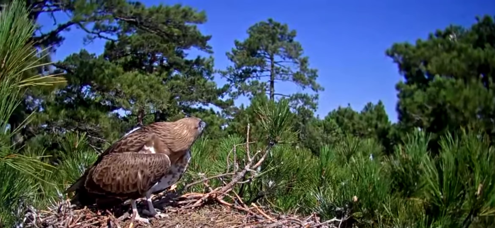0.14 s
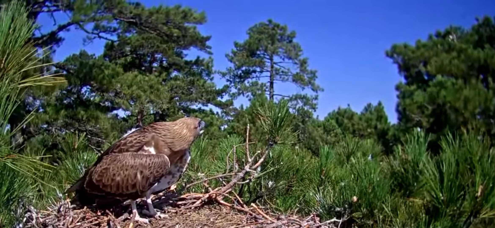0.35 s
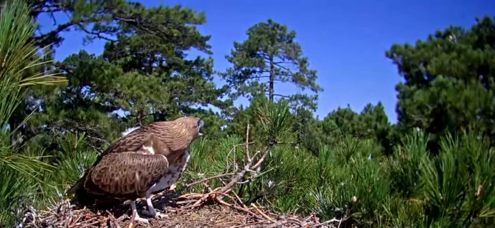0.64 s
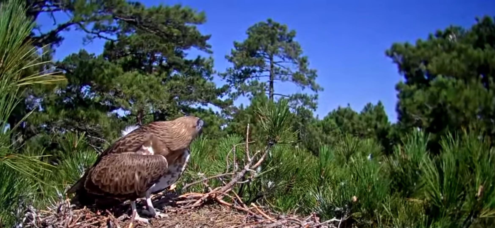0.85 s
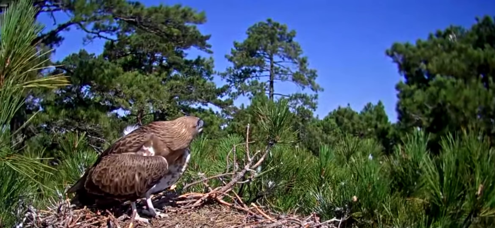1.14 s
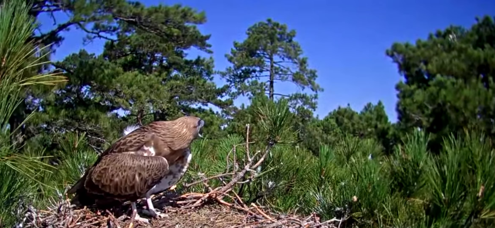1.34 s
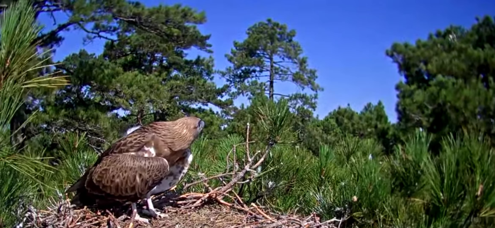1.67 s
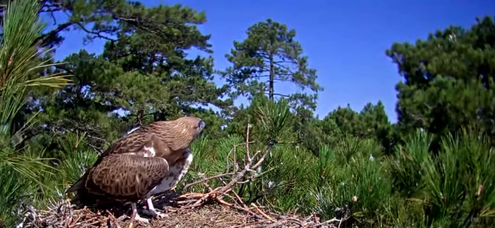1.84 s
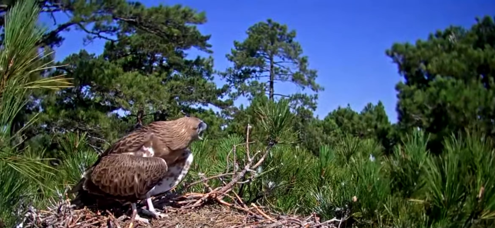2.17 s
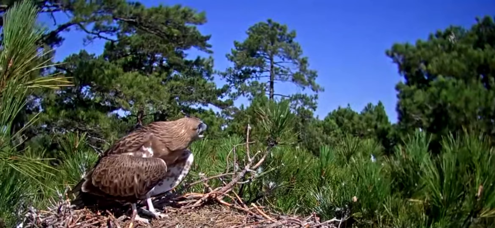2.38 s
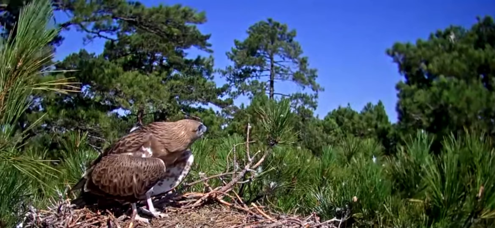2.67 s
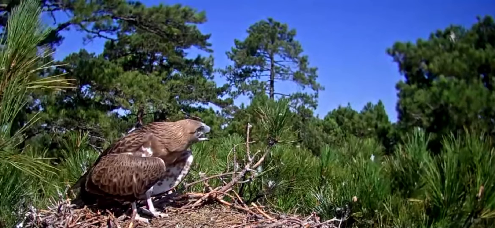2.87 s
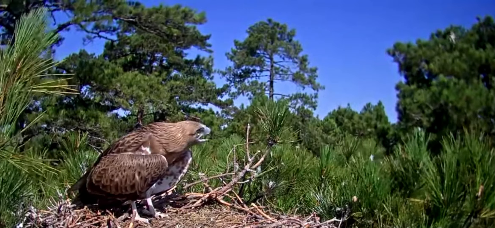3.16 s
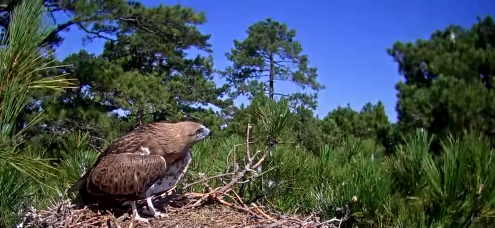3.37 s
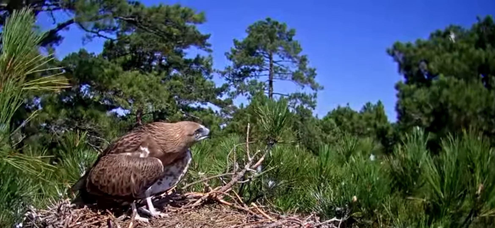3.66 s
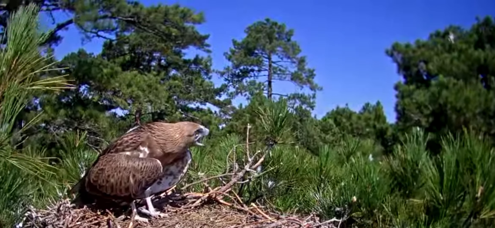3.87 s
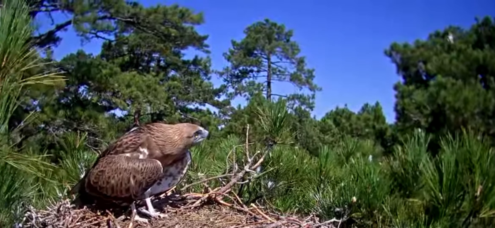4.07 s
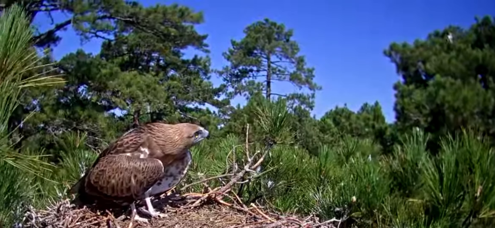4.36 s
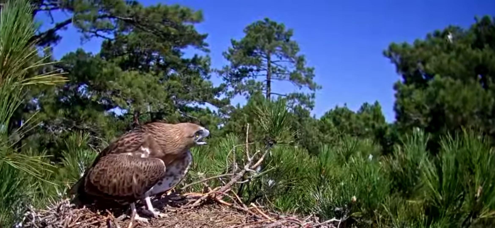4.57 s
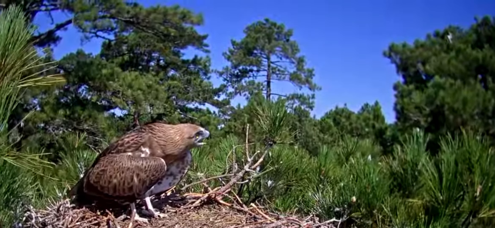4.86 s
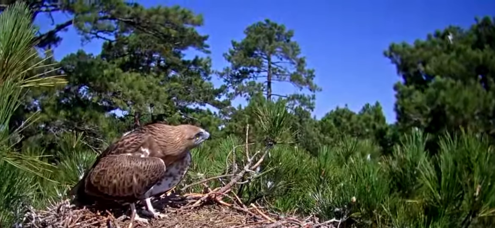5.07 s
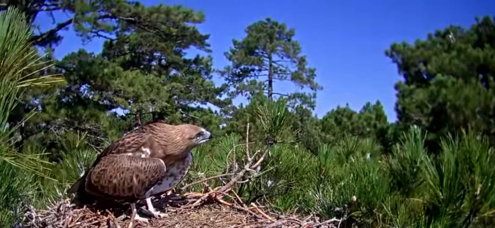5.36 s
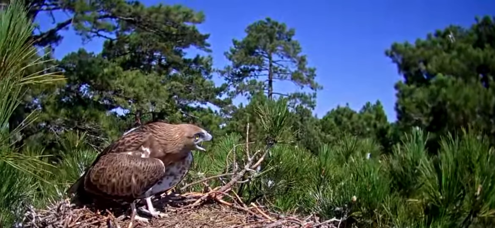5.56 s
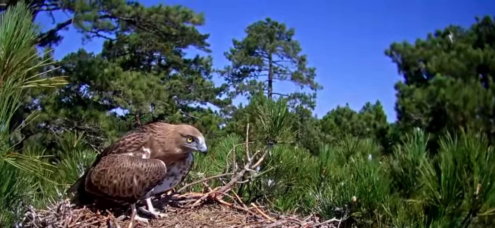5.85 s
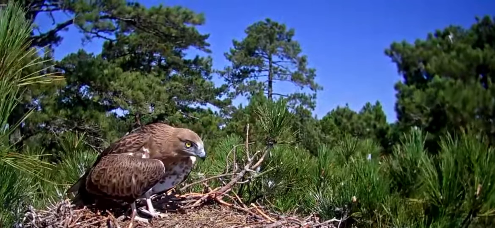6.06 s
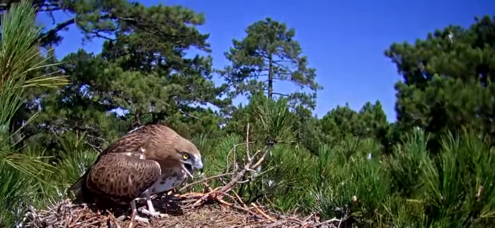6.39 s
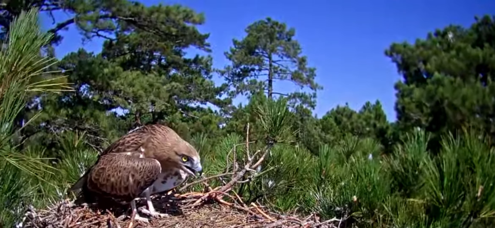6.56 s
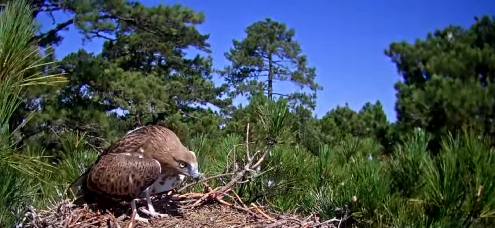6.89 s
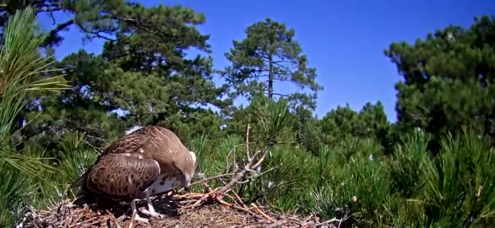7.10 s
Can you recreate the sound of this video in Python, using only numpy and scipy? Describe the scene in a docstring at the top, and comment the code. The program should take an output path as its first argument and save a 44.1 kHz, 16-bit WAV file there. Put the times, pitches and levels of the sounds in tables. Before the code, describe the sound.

Shrill, nearly evenly spaced whistling cries of a young bird of prey, each cracking downward at the end, over low wind buffeting in open pine forest.

```python
"""Young eagle screaming in a pine top

A young eagle screams again and again, close to a small microphone. Each scream jumps through registers:
a chirp, a raspy high note, then a long whistle that breaks into a falling low note. The voice is stacked
overtones of moving pitch, roughened by a second side of the syrinx, flutter and noise ringing the throat.
Low noise rumbles as wind on the microphone, the forest hisses and returns a faint echo; loud peaks clip.
"""
import sys
import numpy as np
from scipy import signal
from scipy.fft import rfft, irfft
from scipy.io import wavfile
from scipy.ndimage import uniform_filter1d

SR = 44100
rng = np.random.default_rng(int(sys.argv[2]) if len(sys.argv) > 2 else 0)


def wav_record(signal):
    """Record a signal, one row per channel, as 16-bit PCM in the file named by sys.argv[1]."""
    frames = np.transpose(np.atleast_2d(signal))
    bounded = np.clip(frames, -1, 1)
    # unit amplitude maps onto the largest positive 16-bit level
    quanta = np.round(bounded * 32767).astype(np.int16)
    wavfile.write(sys.argv[1], SR, quanta)


N = 318843  # samples

# Whistles: t/s, end t/s, settled f/Hz, sharp start f/Hz, drift/(Hz per s), level/dB, fade/(dB per s),
# octave relative level/dB, held flutter level/dB, flutter level at the break/dB, flutter build-up/s
WHISTLES = [(-.03, 0.155, 2334, 340, 10, -33.5, 19.5, -17.5, -30, -6, 0.0093),
            (0.8, 1.037, 2315, 122, 117, -31, 32.5, -19, -38, -24, 0.046),
            (1.604, 1.732, 2350, 162, -46, -34.5, 4, -16, -27.5, -2.5, 0.014),
            (1.734, 1.757, 2365, 5.9, -12, -35.5, 21.5, -16.5, -20, -7.5, 0.03),
            (2.495, 2.708, 2410, 93, -47.5, -33.5, 25, -13.5, -43.5, -23, 0.027),
            (3.29, 3.5, 2386, 153, -9.5, -32, 26.5, -16, -48, -8.5, 0.04),
            (4.108, 4.349, 2395, 135, 47.5, -31, 26, -13.5, -45.5, -25, 0.033),
            (4.977, 5.223, 2398, 126, 0, -31, 26.5, -13.5, -41, -32, 0.035),
            (5.873, 5.96, 2451, 48.5, 8.5, -31, 24.5, -13.5, -40, -7, 0.013),
            (6.702, 6.844, 2579, 160, -400, -31, 18, -11, -46, -4.5, 0.024)]
IDLE_HZ, IDLE_DB = 3280, -51.5  # the high side of the syrinx idles under the whistle, relative level


def whistles():
    """A nearly pure note flutters ever deeper, slower and less evenly as it nears its break."""
    out = np.zeros(N)
    for *shape, octave_db, held_db, break_db, build_s in WHISTLES:
        i, fade, hz, db = note(whistle_contour(*shape), 0.0052)
        size = len(i)
        breaking = undb(break_db) * np.exp((i - i[-1]) / SR / build_s)
        # the depth itself varies less as the break nears
        depth = (undb(held_db) + breaking) * undb(6 * wander(28, size) / (1 + 10 * breaking))

        # a slow membrane at about a seventh of the pitch puts lines mostly below each partial
        unevenness = (.06 + .1 * breaking) * wander(80, size)
        slow = turn(.14 * hz * (1 - .2 * breaking + unevenness))
        flutter = depth * (slow.conj() + 0.065 * slow + .5 * depth * slow.conj() ** 2)

        clean, z = stack(hz, db, db + octave_db + 1.8 * wander(30, size))
        below_octave = undb(db + octave_db + 2.5) * depth * z ** 2 * slow.conj()
        tone = clean * (1 - 0.5 * breaking + flutter) + below_octave
        airflow = undb(db - 24) * (depth + .028) * rasp(size)

        idle_level = undb(db + IDLE_DB + 7 * wander(40, size))
        idle = turn(IDLE_HZ * (1 + .01 * wander(90, size))) * idle_level
        idle = idle * (1 + undb(-12) * z)  # adds the sum tone with the whistle
        out[i] += fade * (tone.imag + airflow + idle.imag)
    return out


WHISTLE_SWELL_S, WHISTLE_ATTACK_S, SETTLE_S = 0.038, .005, .018
SAG_HZ, SAG_DB, SAG_S = 1020, 33, .027  # as the breath runs out
DIVE_HZ, DIVE_S = 29, 0.03  # just before the break


def whistle_contour(s, end, hz, sharp_hz, drift, db, fade_db):
    """Starts sharp, settles and swells; pitch and level sag as the end of the breath nears."""
    now = ticks(max(s, 0), end)
    t = now - s
    breath_end = min(row[1] for row in LOW_NOTES if row[1] > end)  # where the next low note dies
    spent = np.exp((now - breath_end) / SAG_S)
    settling = sharp_hz * np.exp(-t / SETTLE_S)
    dive = DIVE_HZ * np.exp((now - end) / DIVE_S)
    pitch = hz + drift * t + settling - SAG_HZ * spent - dive
    swell = (1 - 0.25 * np.exp(-t / WHISTLE_SWELL_S)) * (1 - 0.88 * np.exp(-t / WHISTLE_ATTACK_S))
    return np.transpose([now, pitch, db - fade_db * t - SAG_DB * spent + 20 * np.log10(swell)])


# The odd lines between the partials: multiple of half the pitch
HALF_LINES = (1, 3, 5, 7)
HOARSE_SHARE = 1.38  # pitch of the other side of the syrinx over the low note
# Low notes that the whistles break into: t/s, breath gone t/s, f/Hz before the droop, droop/s,
# suddenness of the droop (exponent), starting level/dB, hoarseness relative level/dB
LOW_NOTES = [(0.162, 0.259, 1833, 0.041, 1.23, -46.5, -16), (1.044, 1.09, 1863, 0.042, 0.82, -45, -14),
             (1.767, 1.887, 1896, 0.056, 1.12, -43.5, -21.5), (2.715, 2.772, 1858, 0.037, 1.12, -48, -11.5),
             (3.507, 3.591, 1878, 0.044, 1.16, -44.5, -12.5), (4.357, 4.401, 1892, 0.041, 1.06, -43, -10.5),
             (5.232, 5.274, 1875, 0.04, 0.82, -43, -28), (5.971, 6.162, 1958, 0.045, 1.34, -37, -27.5),
             (6.857, 6.977, 2000, 0.042, 0.94, -34.5, -25.5)]


def low_notes():
    """The voice drops in from above and droops; the other side rasps, half lines come when forced."""
    out = np.zeros(N)
    for *shape, hoarse_db in LOW_NOTES:
        rows = low_contour(*shape)
        s, hz, db = rows[0]
        # the louder the break, the longer and deeper the slide into the low register
        force = np.clip((db + 56) / 19, 0, 1)
        start = (s - .005 * force - .002, hz * (1 + .15 * force), db - 1)
        i, fade, hz, db = note([start] + list(rows), 0.0027)
        size = len(i)
        t = (i - i[0]) / SR

        # the overtones die before the fundamental
        octave_db = db + colour(THROAT, 2 * hz) - ((db.max() - db) / 7) ** 2
        clean, z = stack(hz, db, octave_db, lead=np.pi / 4)

        # high-pitched low notes are the forced ones
        forced = np.clip((hz - 1885) / 45, 0, 1) * np.clip(t / 0.018, 0, 1)
        half = np.exp(.5j * np.unwrap(np.angle(z)))
        halves = 0
        for k in HALF_LINES:
            line_db = colour(THROAT, k * hz / 2) - 3.4 * (k > 5)
            halves = halves + undb(line_db) * grain(size) * half ** k

        other = grain(size) * turn(HOARSE_SHARE * hz * (1 + .025 * wander(90, size)))
        # the other side also mixes with the note and its octave
        hoarse = other * (1 + undb(-4.5) * z + undb(-13.5) * z ** 2) * np.clip(t / 0.011, 0, 1)

        # fast unevenness spreads a skirt round the partials
        grit = 1 + undb(-31 + 5 * forced) * wander(520, size)
        tone = clean * grit + undb(db - 15.5) * forced * halves + undb(db + hoarse_db) * hoarse
        airflow = undb(db - 23 + 2.6 * forced) * np.clip(t / .04, 0, 1) * rasp(size)
        out[i] += fade * (tone.imag + airflow)
    return out


def grain(size):
    """Fast random roughness of loudness around 1."""
    return 1 + .38 * wander(180, size)


DROOP_SHARE, DROOP_DB, LOW_FADE_DB_PER_S = 0.31, 48, 15  # share of the pitch; level lost


def low_contour(s, end, hz, droop_s, sudden, db):
    """Pitch and level droop as the last breath goes."""
    t = ticks(s, end)
    spent = np.exp(-(np.abs(end - t) / droop_s) ** sudden)
    level_db = db - LOW_FADE_DB_PER_S * (t - s) - DROOP_DB * spent ** 1.75
    return np.transpose([t, hz * (1 - DROOP_SHARE * spent), level_db])


# The rattling side of the syrinx: f/Hz, relative level/dB (per Hz)
RATTLE = [(1400, -54), (1850, -23), (2070, 7.5), (2230, -12.5), (2480, -2), (2750, -27), (3400, -52)]
# High notes: t/s, length/s, swell/s, starting f/Hz, glide/(Hz per s), level/dB, rasp relative level/dB
HIGH_NOTES = [(0.731, 0.063, 0.031, 3280, -1200, -44.5, -9.5),
              (1.542, 0.058, 0.039, 3280, -1400, -46, -11.5),
              (2.408, 0.079, 0.049, 3325, -1250, -43.5, -11),
              (3.248, 0.035, 0.0032, 3334, -2400, -43, -12.5),
              (4.038, 0.064, 0.024, 3342, -700, -43.5, -10.5),
              (4.903, 0.065, 0.039, 3343, -200, -41.5, -15), (5.784, 0.082, 0.048, 3350, -800, -43, -15),
              (6.657, 0.042, 0.018, 3450, 281.5, -39, -34)]


def high_notes():
    """One side of the syrinx holds a clean tone; the other rattles below, mixes with it and dies away."""
    out = np.zeros(N)
    for *shape, rasp_db in HIGH_NOTES:
        i, fade, hz, db = note(high_contour(*shape), 0.012)
        size = len(i)
        unsteady_hz = hz * (1 + 0.0058 * wander(82, size))
        # the octave swells twice as steeply in dB as the fundamental
        clean, z = stack(unsteady_hz, db, 2 * db - db.max() - 27.5)

        swell = np.sin(np.pi * np.linspace(0, 1, size) ** 1.2) ** 0.8
        rattle = signal.hilbert(noise(RATTLE, size)) * undb(2.5 * wander(60, size))
        # the rattle's octave, and sum and difference tones of the two sides
        mixed = rattle + undb(-22) * rattle ** 2
        mixed = mixed + undb(-19) * z * rattle + undb(-17.5) * z ** 2 * rattle.conj()
        airflow = undb(-14) * rasp(size)
        out[i] += fade * (clean.imag + undb(db + rasp_db) * swell * (mixed.imag + airflow))
    return out


HIGH_START_DB = -31  # relative to the held note


def high_contour(s, length, swell_s, hz, glide, db):
    """The note swells in evenly, holds, and glides a little."""
    t = ticks(0, length)
    gain = np.interp(t, [0, swell_s], [undb(HIGH_START_DB), 1])
    return np.transpose([s + t, hz + glide * t, db + 20 * np.log10(gain)])


# Short rising chirps before a scream: nominal t/s, nominal length/s, start f/Hz, end f/Hz, level/dB
CHIRPS = [(0.697, 0.012, 1665, 1860, -61), (1.515, 0.012, 1730, 1894, -59.5),
          (2.381, 0.016, 2610, 2790, -72), (3.229, 0.0084, 3300, 3420, -59),
          (4.011, 0.013, 1800, 1930, -54.5), (4.874, 0.014, 1760, 1937, -56),
          (5.774, 0.0074, 2570, 2865, -67), (6.622, 0.015, 1910, 2075, -49.5)]


def chirps():
    """Brief upward flicks, rich in overtones."""
    out = np.zeros(N)
    for s, length, start_hz, end_hz, level_db in CHIRPS:
        # the glide starts 7.7 ms after the cue and ends 3 ms before the nominal end (in the shortest chirps
        # that end comes first); 10 ms fades surround it
        rows = [(s + 0.0077, start_hz, level_db), (s + length - .003, end_hz, level_db)]
        i, fade, hz, db = note(rows, 0.01)
        tone, _ = stack(hz, db, db + colour(THROAT, 2 * hz) - 2.0)
        out[i] += fade * tone.imag
    return out


# Colour of throat and beak on the overtones: f/Hz, relative level/dB
THROAT = [(900, -12), (2900, -4.5), (3700, 2), (4700, 2.5), (5050, 2.5), (5450, -17), (6500, -9),
          (7400, -22), (9000, -38.5)]
JITTER = .0018  # spread, share of the pitch
OVERTONE_STEP_DB, OVERTONE_FLICKER_DB = -5.5, 3.5


def stack(hz, db, octave_db, lead=np.pi / 2):
    """Fundamental and octave; higher overtones step down, flicker and take the throat's colour."""
    size = len(hz)
    z = turn(hz * (1 + JITTER * wander(130, size)))
    shimmer = undb(0.088 * wander(150, size))
    upper, step_db = 0, 0
    for k in (2, 3, 4):
        flicker_db = (k > 2) * OVERTONE_FLICKER_DB * wander(60, size)
        tint_db = colour(THROAT, k * hz) - colour(THROAT, 2 * hz)
        upper = upper + undb(octave_db + tint_db + step_db + flicker_db) * z ** k
        step_db += OVERTONE_STEP_DB
    # overtones that lead by up to a quarter turn make the pressure troughs deeper than the crests
    return shimmer * (undb(db) * z + np.exp(1j * lead) * upper), z


# Resonances that unsteady airflow rings in the throat: f/Hz, relative level/dB (per Hz)
RASP = [(1700, -28.5), (2100, -12.5), (2750, -17.5), (3900, -11), (4450, -7), (4750, -16.5), (5080, -4),
        (5550, -26.5), (7500, -43.5)]


def rasp(size):
    """Unsteady airflow in bursts, ringing the throat."""
    return level(noise(RASP, size) * undb(2 * wander(71, size)), 0)


def note(rows, fade_s):
    """Sample range, edge fade, pitch and level of one note; loudness moves evenly in amplitude."""
    s, hz, db = np.transpose(rows)
    i = np.arange(max(int((s[0] - fade_s) * SR), 0), int((s[-1] + fade_s) * SR))
    t = i / SR
    fade = np.clip(np.minimum(t - s[0], s[-1] - t) / fade_s + 1, 0, 1)
    pitch = uniform_filter1d(np.interp(t, s, hz), int(.003 * SR))  # smoothed over 3 ms
    # the root of 2 makes a sine's level an rms level
    return i, np.sqrt(2) * fade, pitch, 20 * np.log10(np.interp(t, s, undb(db)))


def ticks(start, end):
    """Times a millisecond apart, closed by the end itself."""
    return np.append(np.arange(start, end, .001), end)


ECHO_DB, ECHO_T60_S, ECHO_BUILD_S = -47, 1.8, .13  # from the trees
NEAR_ECHO_DB, NEAR_ECHO_T60_S = -26, 0.28  # from near branches


def echo(x):
    """Scattered returns from near branches, and late, dull ones from the trees, as decaying noise."""
    t = np.arange(SR) / SR
    tail = noise([(3000, 0.5), (7000, -6.5)], SR) * undb(-60 * t / ECHO_T60_S)
    tail = tail * np.clip(t / ECHO_BUILD_S, 0, 1)
    near = noise([(3000, 0.0), (7000, -2.5)], SR) * undb(-60 * t / NEAR_ECHO_T60_S)
    both = 0
    for response, db in ((tail, ECHO_DB), (near, NEAR_ECHO_DB)):
        both = both + undb(db) * response / np.sqrt(np.sum(response ** 2))
    return signal.fftconvolve(x, both)[:N]


BUFFET_SPREAD_DB, BUFFETS_PER_S, FLAP_SPREAD_DB = 3.5, 11, 4
THUMP_S = 0.024
WIND_CEILING = .034  # amplitude at which the capsule yields to the hardest gusts
# Wind strength before the capsule yields: t/s, level/dB
GUSTS = [(0, -50), (.8, -52.5), (1.099, -53.5), (1.3, -41.5), (1.599, -37), (1.75, -38), (1.971, -47.5),
         (2.41, -44), (2.852, -54), (3.05, -44), (3.302, -41.5), (3.55, -40), (3.8, -44.5), (4.001, -51.5),
         (4.448, -46.5), (4.65, -53.5), (4.9, -64.5), (5.498, -62.5), (5.7, -52), (5.949, -57.5),
         (6.5, -63), (6.85, -51), (7.1, -50)]
# Single eddies that strike the microphone: t/s, peak level/dB
THUMPS = [(1.209, -40), (1.284, -38), (1.387, -40), (1.498, -29), (1.748, -36.5), (2.599, -32.5),
          (3, -40.5), (3.078, -22.5), (3.169, -27), (3.235, -29.5), (3.43, -31.5), (3.527, -29),
          (3.625, -37), (4.133, -41.5), (4.292, -42), (4.428, -33), (5.68, -46), (6.81, -38.5)]
# Rumble of the wind: f/Hz, relative level/dB (per Hz)
WIND = [(7.1, -27), (12, 3.5), (25, 4), (62, -9), (100, -20), (150, -32), (500, -62.5), (1100, -120)]


def wind():
    """Low turbulence on the microphone in buffets; strong gusts add a sharper flapping."""
    s, db = np.transpose(GUSTS)
    t = np.arange(N) / SR
    # gusts and thumps add in power
    power = undb(2 * np.interp(t, s, db))
    for at, peak_db in THUMPS:
        power = power + undb(2 * peak_db) * np.exp(-((t - at) / THUMP_S) ** 2)
    gust_db = 10 * np.log10(power)

    buffets = wander(BUFFETS_PER_S)
    rumble = level(noise(WIND) * undb(BUFFET_SPREAD_DB * buffets), 0)
    flap = noise([(40, -6.0), (90, 2.0), (180, -11), (350, -29.5), (1500, -90)])
    flap = level(flap * undb(FLAP_SPREAD_DB * (buffets + wander(24))), -14)
    flap_gain = undb(0.32 * (gust_db + 36.5))  # grows with the gust
    pressure = undb(gust_db) * (rumble + flap * flap_gain)
    return WIND_CEILING * np.tanh(pressure / WIND_CEILING)


FOREST_DB = -73.5  # rms level
# Hiss of needles and air: f/Hz, relative level/dB (per Hz)
FOREST = [(88, -53), (150, -13.5), (561, -5), (1800, -19.5), (2440, -26), (5610, -34), (7290, -42.5),
          (12300, -120)]


def forest():
    """Distant needles and air hiss evenly."""
    return level(noise(FOREST) * undb(wander(0.06)), FOREST_DB)


def undb(db):
    """Gain of a level in dB."""
    return 10 ** (np.asarray(db) / 20)


def level(x, db):
    """Scale to an rms level."""
    return x * undb(db) / np.sqrt(np.mean(x ** 2))


def colour(points, hz):
    """Read a spectrum on a log-frequency axis."""
    f, db = np.transpose(points)
    return np.interp(np.log(hz), np.log(f), db)


def noise(points, size=N):
    """Noise with the given spectrum, rms 1."""
    hz = np.maximum(np.fft.rfftfreq(size, 1 / SR), 1)
    return level(irfft(rfft(rng.standard_normal(size)) * undb(colour(points, hz)), size), 0)


def wander(rate_hz, size=N):
    """Smooth chance that changes about rate_hz times a second, rms 1."""
    k = max(int(SR / rate_hz), 2)
    return level(uniform_filter1d(uniform_filter1d(rng.standard_normal(size), k), k), 0)


def turn(hz):
    """A unit phasor that turns at a moving frequency."""
    return np.exp(2j * np.pi * np.cumsum(hz) / SR)


def scene():
    """Bird, its echo, wind and forest."""
    bird = whistles() + low_notes() + high_notes() + chirps()
    return (bird + echo(bird) + wind() + forest())[None]


OVERLOAD = 0.039  # amplitude at which the input clips
VOICE_BAND_HZ, TOP_HZ = 7500, 15700


def record(dry):
    """The input clips, a narrow-band stage cuts the treble, the output clips again under a faint hiss."""
    clipped = np.clip(dry, -OVERLOAD, OVERLOAD)
    voice_band = signal.ellip(12, .3, 70, VOICE_BAND_HZ, fs=SR, output="sos")
    narrow = signal.sosfilt(voice_band, clipped)
    out = np.clip(narrow, -1.06 * OVERLOAD, 1.041 * OVERLOAD)
    out = out + undb(-95.0) * rng.standard_normal(dry.shape)
    top_cut = signal.ellip(8, .2, 60, TOP_HZ, fs=SR, output="sos")
    return signal.sosfilt(top_cut, out)


dry = scene()
out = record(dry)
wav_record(out)
```